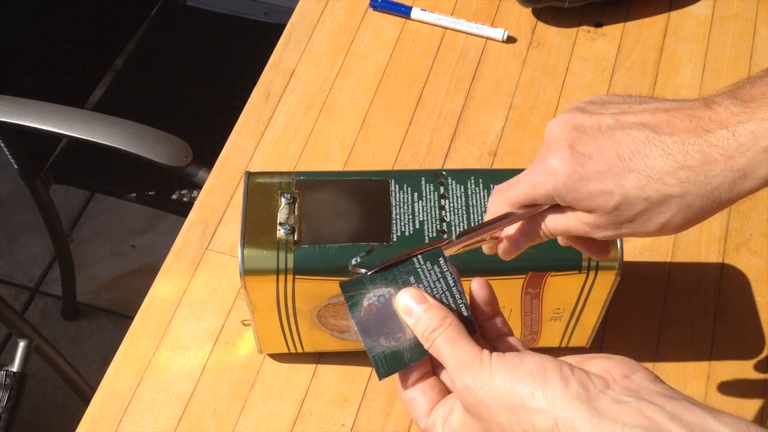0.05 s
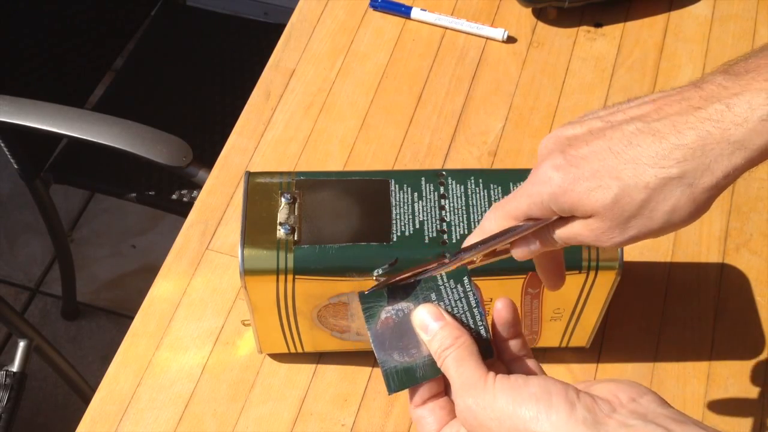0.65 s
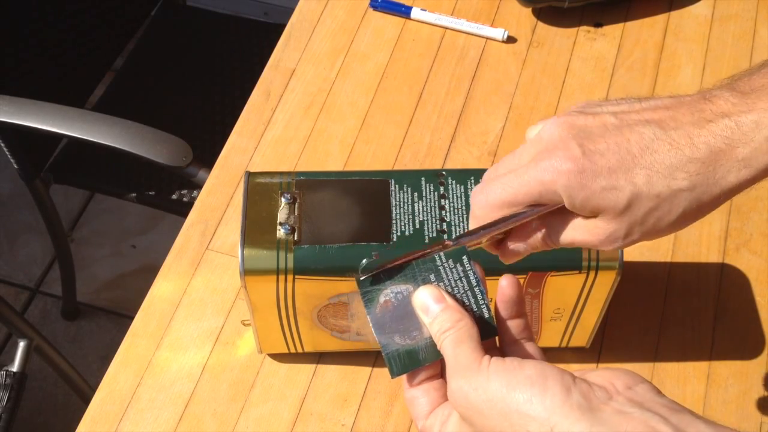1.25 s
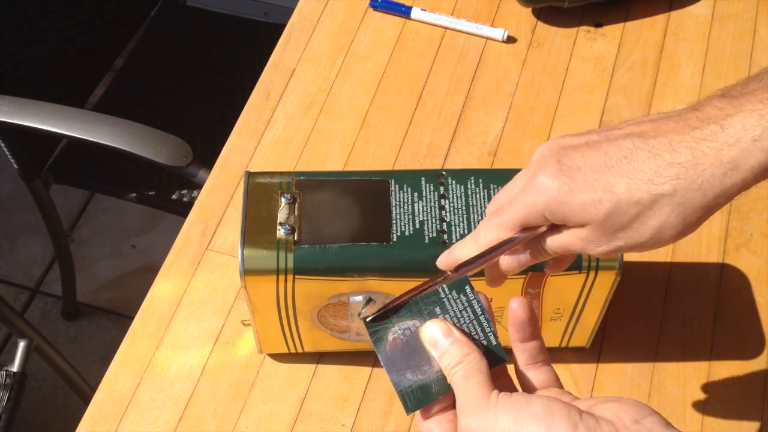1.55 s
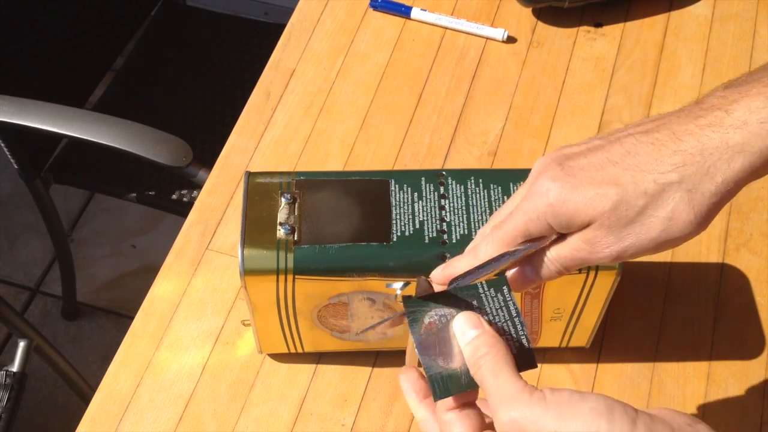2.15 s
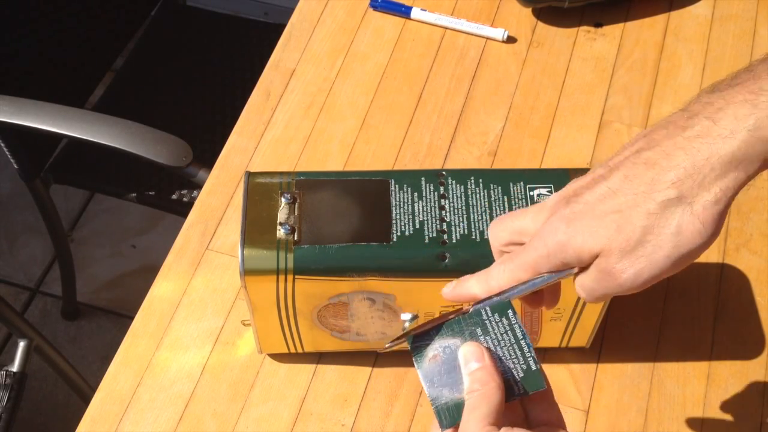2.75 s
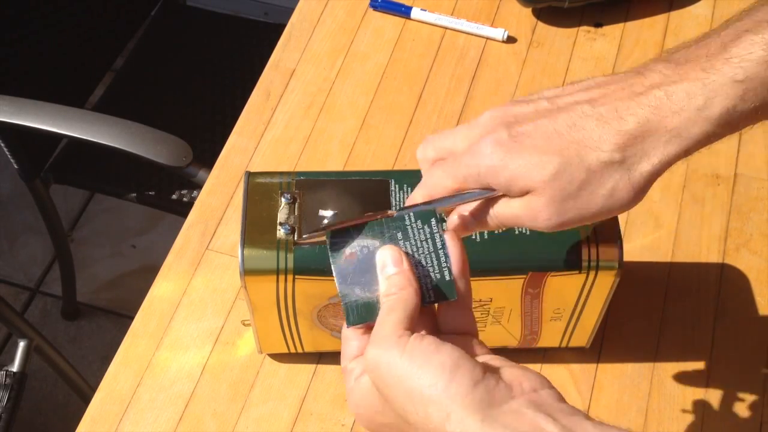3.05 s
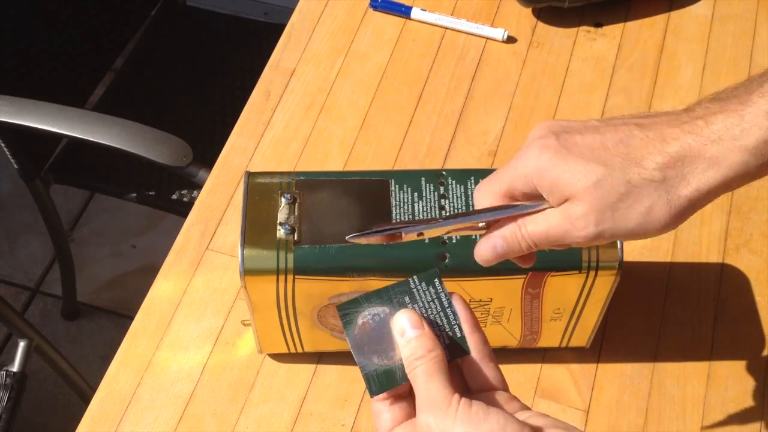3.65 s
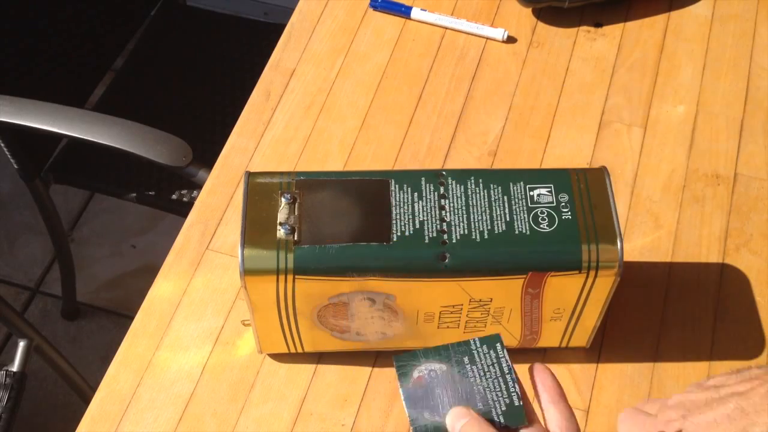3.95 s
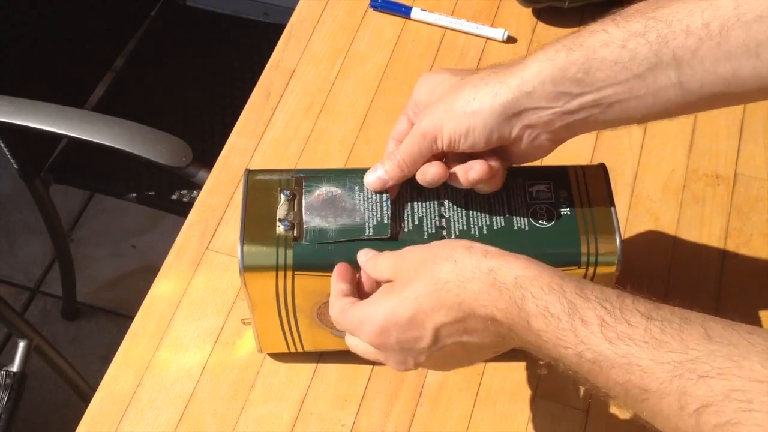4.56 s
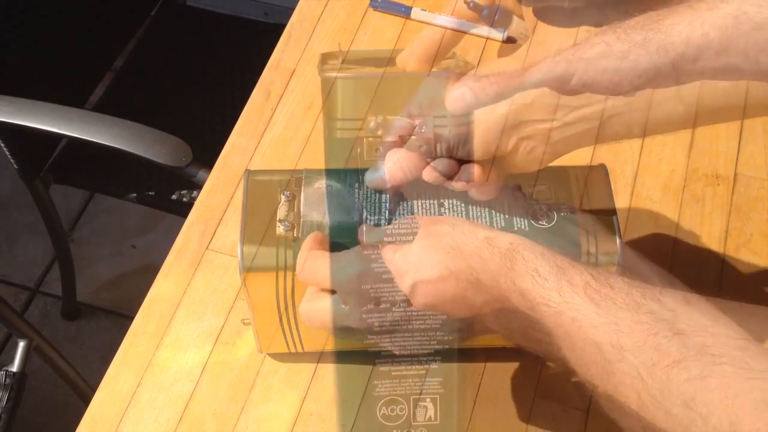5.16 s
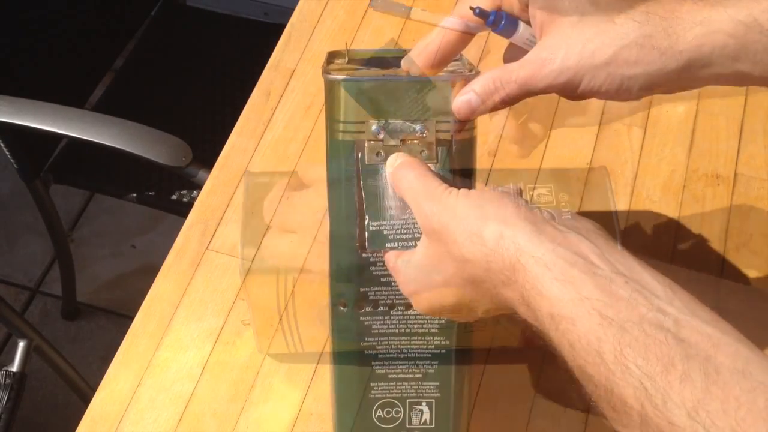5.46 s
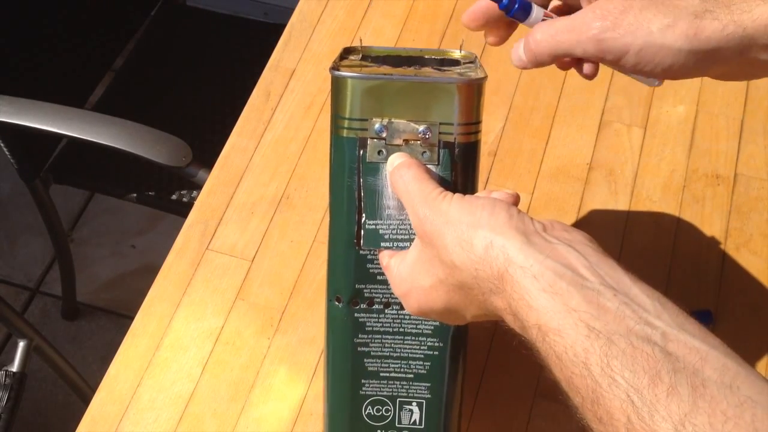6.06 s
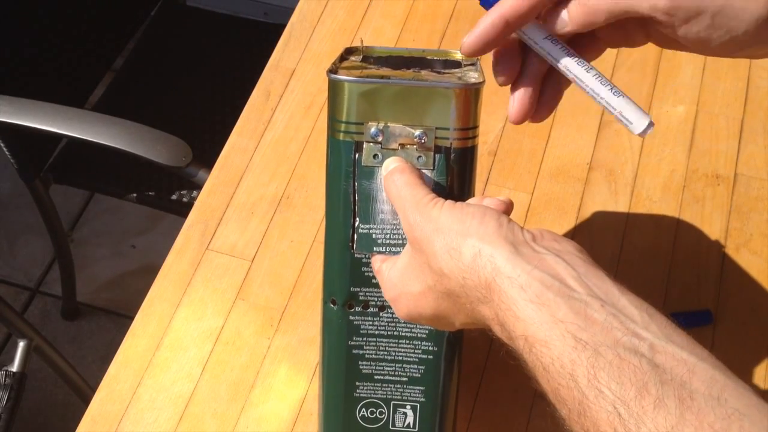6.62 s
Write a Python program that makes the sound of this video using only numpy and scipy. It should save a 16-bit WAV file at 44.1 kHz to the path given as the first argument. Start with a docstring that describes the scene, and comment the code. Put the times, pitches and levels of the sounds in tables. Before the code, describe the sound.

Tin snips crack through thin metal, snap shut and clatter onto a wooden table, then tin scrapes on a can as faint birds whistle.

```python
"""Tin snips click and crack through a small sheet of tin, the blades grinding, squeaking once and
snapping shut. The tool drops on a wooden table and rattles to rest, wood and steel ringing together.
Fingers slide the cut piece over a hollow tin can, tapping and scraping its walls. Behind the close
handwork, garden birds whistle in an echoing yard while a far car passes."""
import sys
import numpy as np
from scipy import signal
from scipy.fft import rfft, irfft, next_fast_len
from scipy.io import wavfile
from scipy.ndimage import map_coordinates

SR = 44100
rng = np.random.default_rng(int(sys.argv[2]) if len(sys.argv) > 2 else 0)


def dump_mix(stems):
    """Bounce the given channels to the path in sys.argv[1] as a 16-bit WAV at rate SR."""
    frames = np.atleast_2d(stems).T  # one column per channel
    limited = np.clip(frames, -1, 1)  # hard clip at full scale
    pcm = np.round(limited * 32767).astype(np.int16)
    wavfile.write(sys.argv[1], SR, pcm)


N = 303849

# Table levels are relative: the functions set each layer's place in the mix.
# tone colours of the garden bed: f/Hz, level/dB
AIR_EQ = [(15, -54), (25, -34), (59, -31.5), (170, -19), (344, 0.5), (796, -7.5), (911, -5), (1100, -7.5),
          (1840, -12), (6050, -20), (10100, -24), (16000, -29.5)]
TYRE_EQ = [(300, -26.5), (600, 0), (1200, 2.5), (2000, 8), (3000, -1.5), (5000, -9), (10000, -59)]
RUMBLE_EQ = [(25, -33), (70, -21), (130, -2.5), (190, 4.5), (280, 0), (500, -23), (1500, -51)]
HISS_EQ = [(300, -26), (750, 4.5), (1500, -7.5), (5000, -15.5), (8300, -12.5), (10000, -51)]
# the yard's reverb time: f/Hz, t60/s
YARD_DECAY = [(200, 0.27), (2000, 0.72), (5000, 0.66), (10000, 0.55)]
# the near bird's slurred notes: t/s, length/s, first f/Hz, last f/Hz, level/dB, trill depth/share of f
SONG_NOTES = [(5.24, 0.12, 1820, 1992, -59, 0.032), (5.412, 0.19, 1848, 1717, -53.5, 0.013),
              (5.649, 0.13, 2500, 2098, -48.5, 0.0082), (5.765, 0.059, 2290, 2233, -48, 0.025),
              (5.859, 0.17, 2200, 2330, -63.5, 0.063), (5.965, 0.19, 2387, 3297, -54, 0.014),
              (6.018, 0.085, 2750, 3020, -54.5, 0.051), (6.195, 0.0636, 1855, 2305, -53.5, 0.0045),
              (6.268, 0.084, 3720, 4060, -57, 0.038), (6.775, 0.04, 5760, 4990, -60, 0.017),
              (6.786, 0.043, 2040, 2170, -61.5, 0.05)]
# small birds' pips: t/s, length/s, f/Hz, level/dB, trill depth/share of f
BIRD_PIPS = [(0.247, 0.089, 4070, -68.5, 0.023), (0.414, 0.11, 4340, -61.5, 0.0062),
             (0.497, 0.095, 4090, -65.5, 0.045), (0.611, 0.11, 5800, -65.5, 0.012),
             (0.67, 0.12, 3600, -65, 0.0077), (0.725, 0.16, 4990, -62, 0.0079),
             (1.019, 0.21, 9700, -72.5, 0.0264), (1.13, 0.072, 4410, -73, 0.018),
             (1.374, 0.13, 5200, -71.5, 0.05), (2.974, 0.092, 4620, -68.5, 0.0043),
             (3.09, 0.1, 3700, -72, 0.028), (3.31, 0.12, 4100, -71.5, 0.032),
             (3.817, 0.04, 7720, -67, 0.011), (5.279, 0.055, 3740, -68, 0.016),
             (5.362, 0.055, 4750, -71.5, 0.007)]

# fingers push the piece over the can: t/s, scrape level/dB, tap level/dB
FINGER_PUSHES = [(4.544, -56, -66), (4.5977, -60, -41.5), (4.628, -56, -47), (4.663, -50, -47),
                 (4.763, -52, -56), (4.876, -52, -48.5), (5.038, -64, -52)]
# the snips hit the table: t/s, thud level/dB, clack level/dB, steel level/dB
BOUNCES = [(4.082, -22, -37, -47), (4.1135, -24.5, -34.5, -34.5), (4.1328, -27.5, -38, -53),
           (4.148, -29, -39.5, -38), (4.161, -21.5, -17, -36), (4.170, -38, -28, -49),
           (4.187, -33, -26.5, -46), (4.192, -37, -25.5, -24), (4.211, -28.5, -34, -41),
           (4.230, -30, -36.5, -46)]
# the jaws shut and rebound: t/s, level/dB
JAW_SHUTS = [(3.481, -22.5), (3.484, -35), (3.488, -40), (3.697, -42)]
# squeezes of the handles: t/s, length/s, first grind level/dB, last grind level/dB
HANDLE_SQUEEZES = [(0.435, 0.061, -57, -58), (1.864, 0.11, -47, -64.5), (2.053, 0.312, -61.5, -59),
                   (2.422, 0.094, -61, -59)]
# the tin cracks between the blades: t/s, level/dB, bright edge offset/dB
TIN_BITES = [(0.3975, -38.5, -8), (0.4055, -39.5, -9), (0.452, -39.5, -12), (0.458, -34.5, -14),
             (0.8939, -42.5, -27), (0.9677, -30, -24), (1.3204, -50, -4), (1.7145, -44, -9),
             (1.985, -51, 4), (2.189, -41, -6), (2.2172, -43, -17), (2.23, -46, -17), (2.339, -48, -2),
             (2.4105, -47.5, -9), (2.4456, -40, -23), (2.4914, -39.5, -12), (3.591, -39, -24)]

# ringing modes, before any extra damping: f/Hz, level/dB, t60/s
CAN_MODES = [(424, 7, 0.074), (640, 3, 0.052), (783, 0.5, 0.094), (830, 1.5, 0.096), (894, -1, 0.2),
             (1700, -13, 0.13), (2680, -7.5, 0.093)]
WOOD_MODES = [(603, 3, 0.019), (795, -5.5, .15), (1163, 0, 0.11), (1430, -4, 0.093), (1805, 1, 0.043),
              (2890, -12, 0.089), (3395, -4, 0.093), (5350, -10, 0.077)]  # the table top
TOOL_ON_WOOD_MODES = [(331, -7, 0.27), (617, -6, 0.3), (682, -6, .25), (1097, -3, .4), (1156, 6, 0.51),
                      (1205, -5, 0.5), (1440, -4.5, 0.61), (1602, 1, .35), (1970, -2.5, 0.38),
                      (2385, 1, 0.2), (3030, 0, 0.37), (3690, 1, 0.14), (4350, -2, 0.22), (5453, -5, 0.18)]  # snips and table top together
STEEL_MODES = [(6400, -2, 0.17), (7840, -3, 0.13), (8263, -9, .14), (9250, 3, .1), (9728, -3.5, 0.16),
               (10640, -6, 0.1), (13250, -11, .07), (14900, -6, .05)]
# tone colours of the contacts: f/Hz, level/dB
SCRAPE_EQ = [(500, -22), (1500, -7), (3000, 5), (4200, 1.5), (5400, 5.5), (7300, 2.5), (11000, -5.5),
             (16000, -7)]  # tin on the can
THUD_EQ = [(25, -23), (150, -24), (300, -4.5), (560, 2.5), (1200, -3), (1800, -9), (2200, -31), (3200, -9),
           (5000, -23), (6600, -14.5), (8000, -31), (15000, -35)]  # dull blow on wood
CLACK_EQ = [(90, -40), (210, -37), (315, -1.5), (380, -8.5), (600, 1), (950, -6), (2400, -1), (4400, -3.5),
            (6500, -10), (9000, -21.5), (16000, -42.5)]  # hard steel on wood
CLASH_EQ = [(2000, -10.5), (5000, 11), (8000, 1), (10500, 4.5), (12000, -4), (15000, -5.5)]  # steel on steel
JAW_EQ = [(600, -24), (1500, -7.5), (2300, 5.5), (3400, -14.5), (4800, 2), (6200, -7.5), (8000, 3.5),
          (9200, -5.5), (10300, 0), (11700, -9), (14400, 6.5), (16000, -1.5)]  # the closing blades
SHEET_EQ = [(500, -31), (1400, -24), (2400, -0.5), (3800, -8), (4700, 0.5), (6100, -8), (7600, -4.5),
            (11200, -10), (16000, -10)]  # the small tin sheet

AIR_DB, AIR_SWELL_DB = -65, 4  # still air, and its lift while the car is nearest
PASS_S, PASS_DB = 4.817, -57.5  # the car at its nearest
APPROACH_S, LEAVE_S = 0.95, 0.24  # its half-power times before and after
RUMBLE_S, RUMBLE_RISE_S, RUMBLE_DB, HISS_DB = 4.7, 1, -68.5, -69
SECOND_VOICE_RATIO, SECOND_VOICE_DB = 1.22, -20  # the other side of the bird's syrinx
CHATTER_S, CHATTER_DB, CHATTER_SAG_DB_PER_S = 4.16, -28.5, 89  # starts with the heaviest blow
SQUEAK_S, SQUEAK_HZ, SQUEAK_DB = 1.884, 8330, -43
JERK_S = 0.051  # the blades advance in jerks of this length
TOP_HZ = 16000


def amp(db):
    """Decibels to gain."""
    return 10 ** (np.asarray(db) / 20)


def unit(x):
    """Scale to rms 1."""
    return x / np.sqrt(np.mean(x ** 2) + 1e-20)


def along(points, hz):
    """Read a curve of (f/Hz, value) points on a log frequency axis."""
    f, v = np.transpose(points)
    return np.interp(np.log(hz + 1), np.log(f), v)


def wobble(rate, size):
    """Smooth random modulation, rate knots a second."""
    return map_coordinates(rng.standard_normal(4096), [np.arange(size) * rate / SR], mode="wrap")


def noise(eq, size):
    """Coloured noise of rms 1."""
    gain = amp(along(eq, np.fft.rfftfreq(size, 1 / SR)))
    return unit(irfft(rfft(rng.standard_normal(size)) * gain, size))


def body(x, eq, size=2048):
    """Colour x like a resonant body: a minimum-phase response of unit energy."""
    cepstrum = irfft(np.log(amp(along(eq, np.fft.rfftfreq(size, 1 / SR)))))
    causal_fold = np.r_[1, np.full(size // 2 - 1, 2), np.zeros(size // 2)]
    return resonate(x, irfft(np.exp(rfft(cepstrum * causal_fold))))


def resonate(x, response):
    """Play x through an impulse response scaled to unit energy."""
    return signal.fftconvolve(x, response / np.linalg.norm(response))[:len(x)]


def highpass(x, hz):
    """Roll off the lows below hz."""
    return signal.sosfilt(signal.butter(2, hz, "high", fs=SR, output="sos"), x)


def add(track, s, x):
    """Mix x into the track at time s."""
    part = track[max(round(s * SR), 0):][:len(x)]
    part += x[:len(part)]


def envelope(s, attack, hold, t60):
    """Rise from time s, hold, then die away; all in seconds."""
    t = np.arange(N) / SR - s
    return np.clip(t / attack, 0, 1) * amp(-60 * np.maximum(t - attack - hold, 0) / t60)


def fade(t60):
    """A quarter second of exponential decay."""
    return amp(-60 * np.arange(SR // 4) / SR / t60)


def burst(t60):
    """A noise hit: countless close modes dying together."""
    return fade(t60) * rng.standard_normal(SR // 4)


def ring(modes, spread_db):
    """Strike the modes, each with a random sign and a level scattered by spread_db."""
    t = np.arange(SR // 4) / SR
    waves = np.zeros(len(t))
    for hz, db, t60 in modes:
        strength = amp(db + spread_db * rng.normal()) * rng.choice([-1, 1])
        waves += strength * fade(t60) * np.sin(2 * np.pi * hz * t)
    return waves / np.linalg.norm(amp(np.array(modes)[:, 1]))


def friction(force, eq, grit_db, slip_rate):
    """Tiny uneven slips that follow the force."""
    slips = unit(rng.standard_normal(N) * amp(grit_db * wobble(slip_rate, N)))
    return body(force * slips, eq)


def air_and_traffic():
    """Still garden air; a far car's tyres swell and pass; a low rumble and faint hiss fade in and stay."""
    t = np.arange(N) / SR
    nearness = 1 / np.hypot(1, (t - PASS_S) / np.where(t < PASS_S, APPROACH_S, LEAVE_S))
    air = amp(AIR_DB + AIR_SWELL_DB * nearness ** 4 + 1.4 * wobble(14, N)) * noise(AIR_EQ, N)
    tyres = nearness * amp(PASS_DB + 0.17 * wobble(3.2, N)) * noise(TYRE_EQ, N)
    rumble = amp(RUMBLE_DB + 1.9 * wobble(2.23, N)) * noise(RUMBLE_EQ, N)
    hiss = amp(HISS_DB) * noise(HISS_EQ, N)
    fade_in = np.clip((t - RUMBLE_S) / RUMBLE_RISE_S, 0, 1)
    return air + tyres + fade_in * (rumble + hiss)


def yard(x):
    """Reverb from walls and trees, each frequency dying at its own speed."""
    hz, t, spectra = signal.stft(rng.standard_normal(SR), SR, nperseg=256)
    decay = amp(-60 * t / along(YARD_DECAY, hz)[:, None])
    tail = signal.istft(spectra * decay, SR, nperseg=256)[1]
    return resonate(x, tail)


def whistle(length, first_hz, last_hz, trill, glide_share=0.55, trill_hz=115, waver=0.6):
    """One bird note: it glides on to its pitch and holds it, with a fast trill."""
    size = int(length * SR)
    t = np.arange(size) / SR
    glide = np.sin(np.pi / 2 * np.minimum(t / (length * glide_share), 1))
    flutter = np.sin(2 * np.pi * trill_hz * t) + waver * wobble(248.4, size)
    hz = (first_hz + (last_hz - first_hz) * glide) * (1 + trill * flutter)
    return signal.windows.tukey(size, 0.35) * np.sqrt(2) * np.sin(2 * np.pi * np.cumsum(hz) / SR)


def birds():
    """A two-voiced phrase and thin pips, a little more wet than dry."""
    song = np.zeros(N)
    for s, length, first_hz, last_hz, db, trill in SONG_NOTES:
        add(song, s, amp(db) * whistle(length, first_hz, last_hz, trill))
        upper = whistle(length, first_hz * SECOND_VOICE_RATIO, last_hz * SECOND_VOICE_RATIO, trill)
        add(song, s, amp(db + SECOND_VOICE_DB) * upper)
    for s, length, hz, db, trill in BIRD_PIPS:
        add(song, s, amp(db) * whistle(length, hz, hz, trill))
    return amp(-2.5) * song + amp(-1.5) * yard(song)


def can_slide():
    """Each push taps the can and scrapes the piece along; the scrape sets the hollow walls humming."""
    taps, force = np.zeros((2, N))
    for s, scrape_db, tap_db in FINGER_PUSHES:
        add(taps, s, amp(tap_db) * ring(CAN_MODES, spread_db=-2.5))
        force += amp(scrape_db) * envelope(s, attack=0.0045, hold=0.0071, t60=0.15)
    scrape = friction(force, SCRAPE_EQ, grit_db=2, slip_rate=2100)
    hum = unit(resonate(scrape, ring(CAN_MODES, spread_db=3))) * np.std(scrape)
    return highpass(taps, hz=300) + amp(-1) * scrape + amp(-3) * hum


def rattle():
    """Dense tiny contacts that weaken steadily, then stop as the tool settles."""
    contacts = unit(rng.standard_normal(N) * amp(1.8 * wobble(350, N)))
    age = np.maximum(np.arange(N) / SR - CHATTER_S, 0)
    gate = envelope(CHATTER_S, attack=0.0024, hold=0.094, t60=0.058)
    return amp(CHATTER_DB - CHATTER_SAG_DB_PER_S * age) * gate * contacts


def tool_drop():
    """Tip and handles hit the wood in turn, the blades clash, and the tool chatters to rest."""
    thuds, clacks, clashes, modes = np.zeros((4, N))
    wood_damping = fade(t60=0.47)
    for s, thud_db, clack_db, steel_db in BOUNCES:
        add(thuds, s, amp(thud_db) * (burst(t60=0.021) + amp(-13) * burst(t60=0.21)))
        add(clacks, s, amp(clack_db) * (burst(t60=0.058) + amp(1) * burst(t60=0.0097)))
        add(clashes, s, amp(steel_db) * burst(t60=0.05))
        add(modes, s, amp(thud_db - 1) * ring(WOOD_MODES, spread_db=-0.5))
        add(modes, s, amp(clack_db - 5) * ring(TOOL_ON_WOOD_MODES, spread_db=-0.5) * wood_damping)
        add(modes, s, amp(steel_db - 3) * ring(STEEL_MODES, spread_db=2.5))
    chatter = rattle()
    sustain = ring(TOOL_ON_WOOD_MODES, spread_db=0) * fade(t60=0.082)
    modes += amp(-4) * resonate(chatter, sustain)  # tiny contacts keep the same modes alive
    modes = highpass(highpass(modes, hz=210), hz=210)  # small parts radiate almost no bass
    wood = body(thuds, THUD_EQ) + body(clacks + amp(-1) * chatter, CLACK_EQ)
    steel = body(clashes + amp(-21) * chatter, CLASH_EQ)
    return highpass(wood, hz=110) + steel + modes


def jaw_clacks():
    """Out of the cut, the blades close steel on steel with a bright clack."""
    clacks = np.zeros(N)
    for s, db in JAW_SHUTS:
        add(clacks, s, amp(db) * (burst(t60=0.0085) + amp(-12.5) * burst(t60=0.061)))
    return body(clacks, JAW_EQ)


def blade_squeak():
    """Stick-slip locks on to one high blade mode, with a rasp around it."""
    phase = 2 * np.pi * np.cumsum(SQUEAK_HZ + 50 * wobble(500, N)) / SR
    tone = amp(2.4 * wobble(350, N)) * np.sqrt(2) * np.sin(phase)
    rasp = noise([(6000, -34), (8300, 0), (9500, -1), (12000, -20)], N)
    gate = envelope(SQUEAK_S, attack=0.006, hold=0.038, t60=0.093)
    return amp(SQUEAK_DB) * gate * (tone + amp(-10.5) * rasp)


def squeeze_force():
    """Force on the cut: it swells and lets go with every jerk of the blades."""
    force = np.zeros(N)
    for s, length, first_db, last_db in HANDLE_SQUEEZES:
        t = np.arange(int(length * SR)) / SR
        jerks = np.sin(np.pi * t / JERK_S) ** 2
        add(force, s, amp(np.linspace(first_db, last_db, len(t))) * jerks)
    return force


def cutting(low_hz=2800, high_hz=10000, mode_count=12):
    """Tin cracks ahead of the grinding blades; each bite frees more sheet, so it rings at new pitches."""
    cracks = np.zeros(N)
    for s, db, edge_db in TIN_BITES:
        pitches = low_hz * (high_hz / low_hz) ** rng.random(mode_count)
        sheet_modes = [(hz, 0, 0.016) for hz in pitches]
        snap = burst(t60=0.008) + amp(-19) * burst(t60=0.045)
        ping = amp(-4) * ring(sheet_modes, spread_db=2)
        add(cracks, s, amp(db - 4.5) * (snap + ping))
        add(cracks, s, amp(db + edge_db + 2) * highpass(burst(t60=0.022), hz=9050))
    grind = friction(squeeze_force(), SHEET_EQ, grit_db=4, slip_rate=370)
    blade_ring = ring([(2408, 6, 0.02), (4930, -7, 0.013), (8500, -2, 0.01)], spread_db=-0.5)
    return body(cracks, SHEET_EQ) + amp(-1) * grind + amp(-11) * resonate(grind, blade_ring)


def scene():
    """Close, nearly dry handwork in front of the garden, in mono."""
    handwork = cutting() + jaw_clacks() + blade_squeak() + tool_drop() + can_slide()
    return (handwork + amp(-34) * yard(handwork) + birds() + air_and_traffic())[None]


def record(dry):
    """The microphone's band limit: a steep high cut at TOP_HZ."""
    size = next_fast_len(N + SR // 2)
    gain = 1 / (1 + (np.fft.rfftfreq(size, 1 / SR) / TOP_HZ) ** 160)
    return irfft(rfft(dry, size) * gain, size)[:, :N]


dry = scene()
out = record(dry)
dump_mix(out)
```